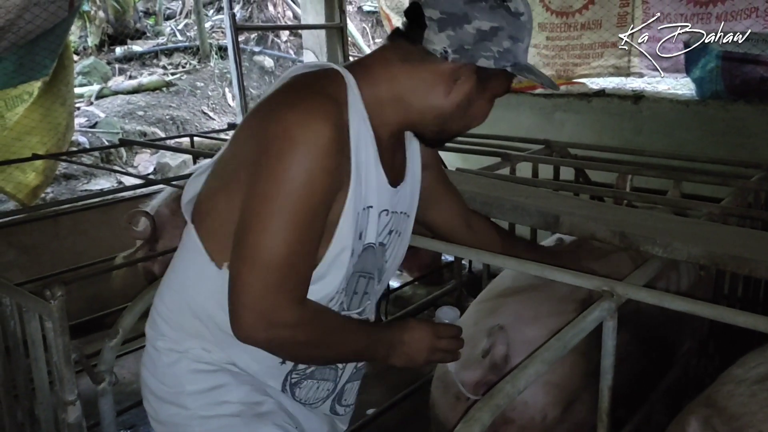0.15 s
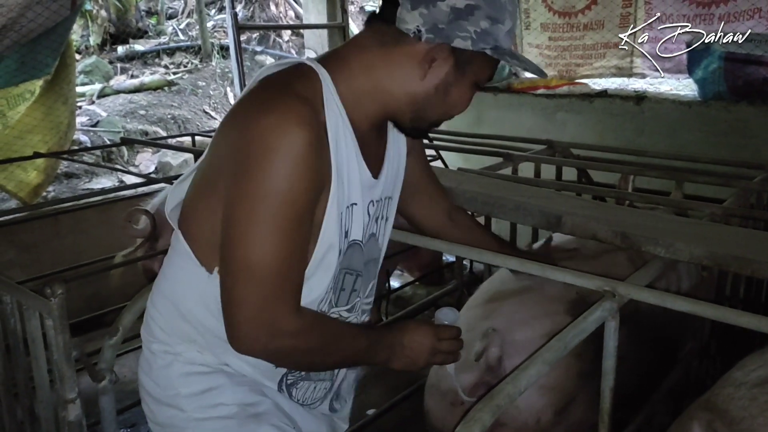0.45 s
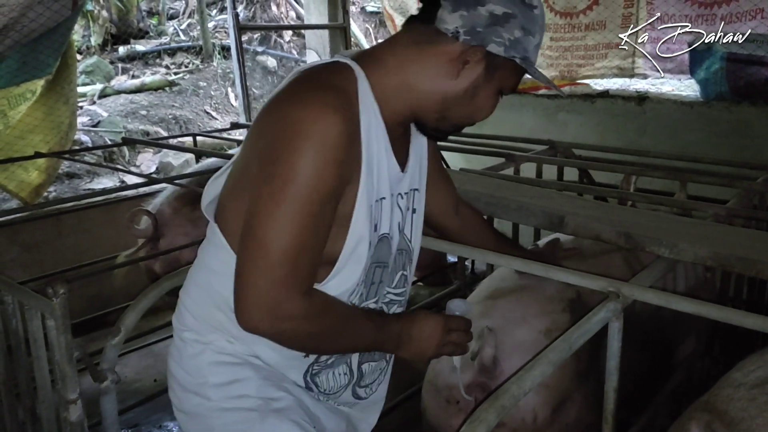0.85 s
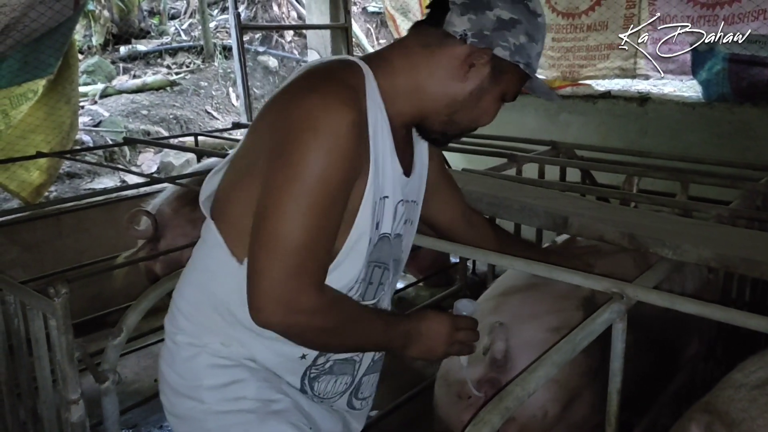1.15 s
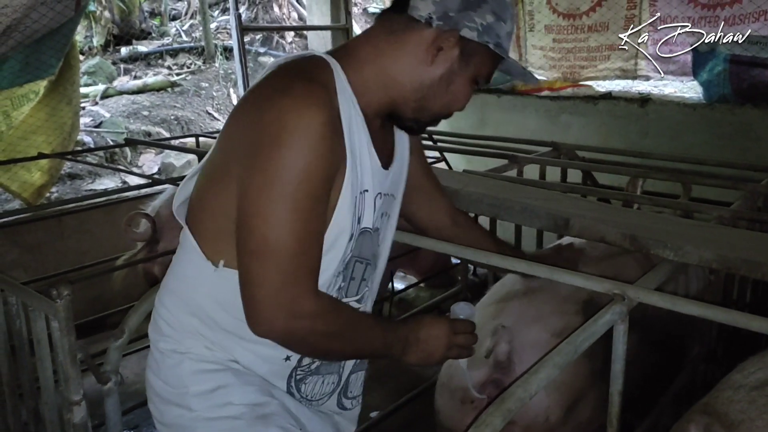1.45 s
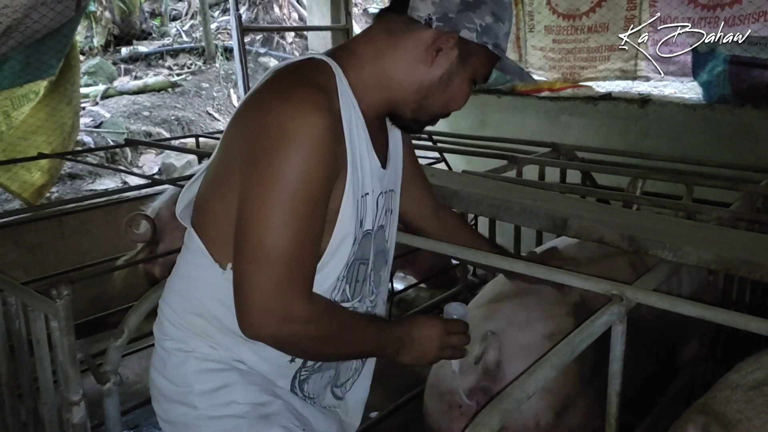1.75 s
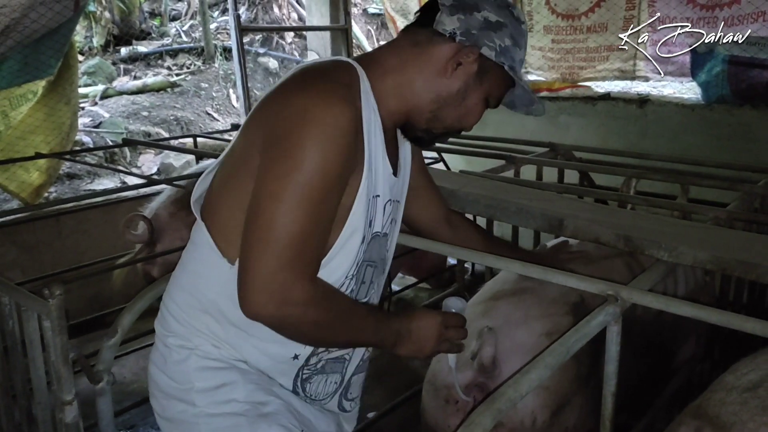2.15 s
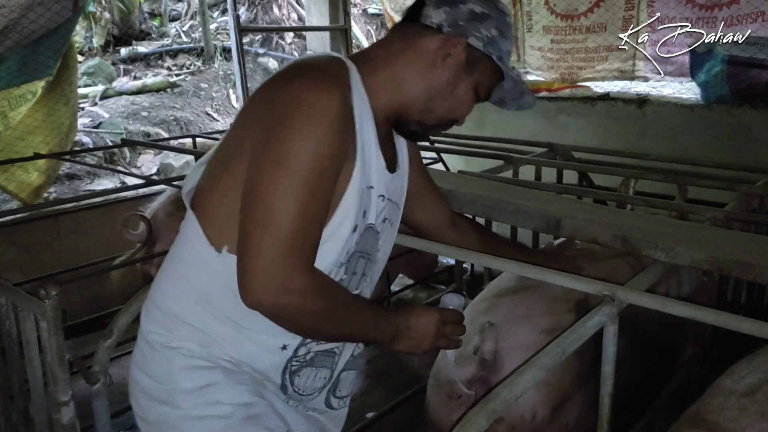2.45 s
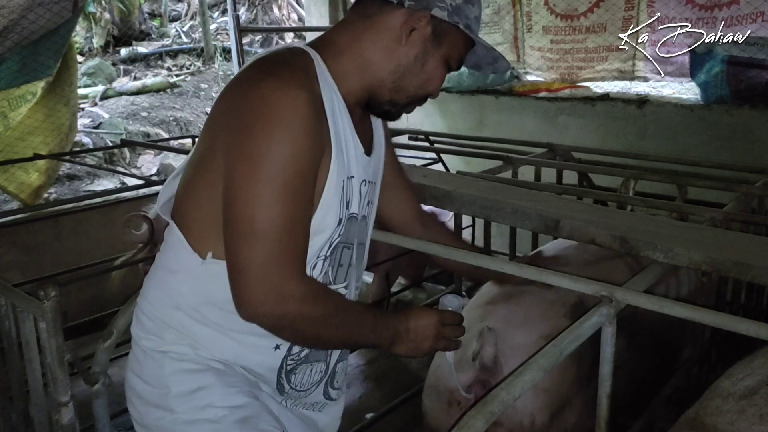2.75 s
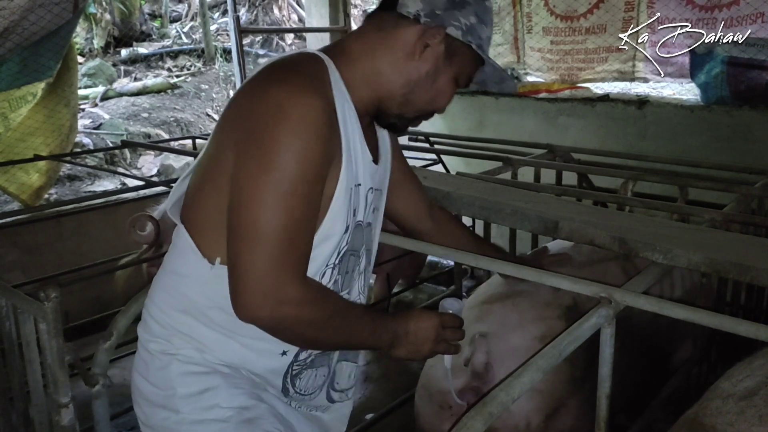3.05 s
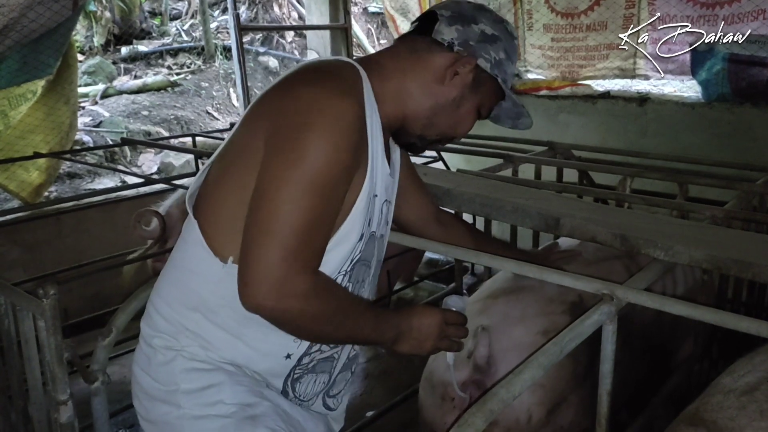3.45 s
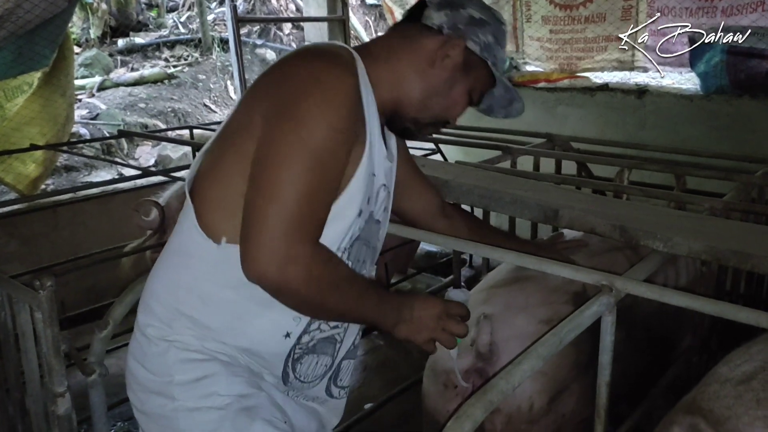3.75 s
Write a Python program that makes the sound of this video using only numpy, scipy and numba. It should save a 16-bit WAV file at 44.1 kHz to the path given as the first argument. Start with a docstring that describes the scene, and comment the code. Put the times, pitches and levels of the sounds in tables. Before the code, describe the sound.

Pigs grunting hoarsely in short calls inside a reverberant pen, ending in a drawn-out rasp.

```python
"""Sows grunting in a pen

Hoarse, short grunts, some built from overlapping parts, in a concrete pen under a low roof.
The last trails into a long rasp. Uneven throat flaps and the air past them ring chest, throat and snout.
Low moans and a thin nasal whistle join in; snorts, scuffles and knocks on the stalls are shaped noise.
The pen adds reflections, a tail and standing waves; a faint outdoor hiss and rumble lies beneath."""
import sys
import numpy as np
from scipy import signal
from scipy.fft import rfft, irfft
from scipy.io import wavfile
from scipy.ndimage import uniform_filter1d
from numba import njit

SR = 44100
rng = np.random.default_rng(int(sys.argv[2]) if len(sys.argv) > 2 else 0)


def log_audio(samples):
    """Write samples as a 16-bit WAV file to the path given in sys.argv[1]."""
    # one column per channel
    frames = np.atleast_2d(samples).T
    # limit to full scale, then quantise
    limited = np.clip(frames, -1, 1)
    pcm = np.round(limited * 32767).astype(np.int16)
    wavfile.write(sys.argv[1], SR, pcm)


N = 171990
T_S = np.arange(N) / SR
BINS_HZ = np.fft.rfftfreq(N, 1 / SR)

# reverberation of the pen: [f/Hz, t60/s, left-right likeness/0-1]
PEN_DECAY = [(120, 0.99, 0.96), (280, 0.46, 0.92), (630, 0.77, 0.61), (1200, 0.39, 0.02), (3000, 0.59, 0),
             (6000, 0.46, 0), (12000, 0.2, 0)]


def undb(db):
    """Level in dB to amplitude."""
    return 10 ** (np.asarray(db) / 20)


def unit(x):
    """Scale to rms 1."""
    return x / np.sqrt(np.mean(x ** 2))


def noise():
    """White noise, rms about 1."""
    return rng.standard_normal(N)


def over_hz(table, col):
    """A table column interpolated over log frequency, for every bin."""
    table = np.array(table, float)
    return np.interp(np.log(BINS_HZ + 1), np.log(table[:, 0]), table[:, col])


@njit
def svf(x, hz, width_hz):
    """State-variable band-pass with a moving centre, unity gain there."""
    y, band, low = np.empty(len(x)), 0., 0.
    for i in range(len(x)):
        g = np.tan(np.pi * hz[i] / SR)
        damping = width_hz / hz[i]
        v = (band + g * (x[i] - low)) / (1 + g * (g + damping))
        band = 2 * v - band
        low = low + 2 * g * v
        y[i] = damping * v
    return y


def resonate(x, hz, width_hz):
    """A steep resonance: two equal band-passes in series, rms 1."""
    centre_hz = np.minimum(hz, .45 * SR) * np.ones(N)
    once = svf(x, centre_hz, float(width_hz))
    return unit(svf(once, centre_hz, float(width_hz)))


def notch(x, hz, width_hz, depth):
    """A side cavity swallows one band: the band-pass is subtracted, twice."""
    for _ in range(2):
        x = x - np.clip(depth, 0, 1) * svf(x, hz * np.ones(N), float(width_hz))
    return x


def swell(at_s, rise_s, hold_s, fall_s):
    """Envelope, linear in dB: rise and fall times are per 20 dB."""
    before = np.maximum((at_s - T_S) / rise_s, 0)
    after = np.maximum((T_S - at_s - hold_s) / fall_s, 0)
    return undb(-20 * np.minimum(before + after, 10))


def flaps(rate):
    """Uneven throat flaps as pulses, and a decaying puff of air after each; both rms 1."""
    jitter, scatter_db, puff_cycles = .22, 1.5, .45
    steady_air = .11  # leak between flaps, against a puff
    chance = rng.standard_normal((800, 2))
    times_s = np.cumsum(np.exp(jitter * chance[:, 0])) / rate
    cycle = np.interp(T_S, np.r_[0, times_s[:-1]], np.arange(len(times_s)))
    size = undb(scatter_db * chance[:, 1])[cycle.astype(int)]
    pulses = np.diff(np.floor(cycle), prepend=0) * size
    puffs = noise() * size * (steady_air + np.exp(-(cycle % 1) / puff_cycles))
    return unit(pulses), unit(puffs)


def voiced(source, air):
    """Flaps and air blended; air is a share of power."""
    air = np.clip(air, 0, 1)
    pulses, puffs = source
    return np.sqrt(1 - air) * pulses + np.sqrt(air) * puffs


def waver():
    """Random trembling of a resonance, as a factor on its frequency."""
    steps_per_s, rms_octaves = 28, .031
    size = int(SR / steps_per_s)
    steps = noise()[np.arange(N) // size]
    return np.exp2(rms_octaves * unit(uniform_filter1d(steps, size)))


def diffuse():
    """Spectra of left and right noise, as alike at each frequency as the pen makes them."""
    alike = np.clip(over_hz(PEN_DECAY, 2), 0, 1)
    common = rfft(noise()) * np.sqrt(1 + alike)
    opposed = rfft(noise()) * np.sqrt(1 - alike) * np.array([[1], [-1]])
    return (common + opposed) / np.sqrt(2)


def yard():
    """Faint outdoor hiss and rumble: diffuse noise coloured by a spectrum."""
    # outdoor spectrum: [f/Hz, relative density/dB]
    outdoor = [(18, -52), (30, -42), (76, -8), (137, -9.5), (254, 0), (1380, -11), (3230, -10),
               (6640, -18.5), (7750, -20), (8810, -23), (10600, -18.5), (12000, -23.5), (14000, -16)]
    return undb(-37) * unit(irfft(diffuse() * undb(over_hz(outdoor, 1)), N))


def standing_waves(x):
    """Narrow frequencies that build up between the walls."""
    # pen modes: [f/Hz, width/Hz, gain at f/dB]
    modes = [(374, 14, 6), (515, 18, 3), (1105, 30, 3), (1160, 24, 1), (1245, 24, 3), (1781, 24, 4),
             (3880, 90, 3)]
    gain = 1 + sum((undb(db) - 1) / (1 + 2j * (BINS_HZ - hz) / width_hz) for hz, width_hz, db in modes)
    return irfft(rfft(x) * gain, N)


def pen(x):
    """Direct sound plus noise decaying fast (walls and roof) and slowly (tail), band by band."""
    early_tau_s, early_db, tail_db, direct_db = .029, -3.5, -5, -9.5
    field, response = diffuse(), 0
    for k, (_, t60_s, _) in enumerate(PEN_DECAY):
        weights = [(row[0], j == k) for j, row in enumerate(PEN_DECAY)]
        band = irfft(field * over_hz(weights, 1), N)
        power = 0
        for tau_s, db in ((early_tau_s, early_db), (t60_s / np.log(1000), tail_db)):
            power = power + undb(db) ** 2 * np.exp(-2 * T_S / tau_s) * 2 / (tau_s * SR)
        response = response + band * np.sqrt(power)
    reflected = signal.fftconvolve(x[None], standing_waves(response), axes=1)[:, :N]
    return undb(direct_db) * x + reflected


def bands(source, levels_db):
    """A source spread over six broad bands at the given levels."""
    # noise bands: [f/Hz, section width/Hz]
    broad = [(380, 440), (1200, 980), (2250, 2120), (3700, 2600), (6300, 10200), (12300, 3600)]
    return sum(undb(db) * resonate(source, hz, width_hz) for db, (hz, width_hz) in zip(levels_db, broad))


def knocks():
    """Knocks on the stalls: short noise clacks, each with one ringing resonance."""
    # knocks: [t/s, ring f/Hz, ring level/dB, six broad-band levels/dB]
    hits = [ (0.158, 3300, -27.5, -45, -48, -37, -27, -45, -47),
            (0.628, 2540, -41, -30, -39, -26, -48, -32.5, -42),
            (1.139, 2090, -31, -58, -53, -31.5, -38.5, -48, -47),
            (1.233, 1400, -32, -30.5, -27.5, -39, -46, -59, -46),
            (1.706, 3330, -36, -54, -38, -31, -35.5, -30.5, -41),
            (2.227, 2730, -28, -37, -55, -33.5, -28.5, -48, -52),
            (2.25, 1200, -35.5, -52, -33, -35, -46, -57, -60),
            (2.386, 3300, -39.5, -58, -54, -53, -55, -55, -56),
            (2.997, 3100, -38.5, -61, -37.5, -32, -44, -40, -42.5),
            (3.804, 2300, -29, -60, -27, -24.5, -35, -36, -44)]
    out = 0
    for at_s, hz, db, *levels_db in hits:
        ring = undb(db) * resonate(noise(), hz, width_hz=440)
        envelope = swell(at_s, rise_s=.0014, hold_s=.0084, fall_s=.017)
        out = out + envelope * (bands(noise(), levels_db) + ring)
    return out


def snorts():
    """Snorts and scuffles: fluttering puffs and steady noise in broad bands."""
    # snorts: [t/s, rise/s per 20 dB, hold/s, fall/s per 20 dB, six broad-band levels/dB]
    rushes = [ (.01, 0.04, 0.013, 0.058, -44, -37, -34.5, -44, -43, -54),
              (0.171, 0.011, 0.028, 0.16, -53, -36, -33.5, -27.5, -32, -36.5),
              (.36, 0.035, 0.066, 0.072, -37, -69, -33.5, -36.5, -45, -38.5),
              (.50, 0.053, 0.0095, 0.024, -67, -58, -54, -47, -40, -39.5),
              (0.644, 0.018, 0.0085, 0.083, -27.5, -24.5, -22, -25.5, -29, -38),
              (0.704, 0.041, 0.0071, 0.056, -64, -63, -27.5, -30.5, -40, -39),
              (0.866, 0.039, 0.022, 0.074, -32.5, -24.5, -15, -36, -27, -27.5),
              (0.906, 0.03, 0.005, 0.09, -71, -21, -33, -31, -60, -43),
              (1.04, 0.04, 0.016, 0.12, -41, -38.5, -62, -65, -44.5, -43),
              (1.193, 0.041, 0.013, 0.03, -59, -52, -42, -36.5, -36, -43),
              (1.275, 0.035, 0.022, 0.25, -40.5, -55, -45, -46, -43, -47),
              (2.092, 0.18, 0.023, 0.058, -36, -69, -48, -56, -60, -63),
              (2.33, 0.1, 0.015, 0.037, -37.5, -38.5, -36.5, -42, -42, -41.5),
              (2.821, 0.059, 0.012, 0.031, -36, -33, -65, -35, -56, -42.5),
              (3.02, 0.062, 0.095, 0.13, -70, -47, -37.5, -42, -42, -46),
              (3.485, 0.035, 0.016, 0.047, -43.5, -43, -43, -38, -60.5, -42),
              (3.649, 0.053, 0.069, 0.16, -33, -41, -31, -50, -70, -65),
              (3.784, 0.048, 0.0088, 0.094, -67, -35, -24.5, -31, -28, -30.5)]
    out = 0
    for at_s, rise_s, hold_s, fall_s, *levels_db in rushes:
        air = flaps(rate=110)[1] + .54 * noise()
        out = out + swell(at_s, rise_s, hold_s, fall_s) * bands(air, levels_db)
    return out


def whistle():
    """Air squeezed through a narrow nostril before the first grunt: narrow-band noise."""
    # whistle, one row: t/s, rise/s per 20 dB, hold/s, fall/s per 20 dB, level/dB, f/Hz, section width/Hz
    nostril = (.106, .006, .035, .06, -36, 4220, 450)
    at_s, rise_s, hold_s, fall_s, db, hz, width_hz = nostril
    return undb(db) * swell(at_s, rise_s, hold_s, fall_s) * resonate(noise(), hz, width_hz)


def moans():
    """Low, almost tonal voice: only the throat rings, and its resonance may slide."""
    # moans: [t/s, rise/s per 20 dB, hold/s, fall/s per 20 dB, level/dB, throat f/Hz at t, climb/(Hz/s)]
    calls = [(0.82, 0.044, .06, 0.053, -39, 202, -550), (2.088, 0.073, 0.026, 0.036, -40, 570, 0),
             (2.345, 0.3, 0.076, 0.056, -36.5, 482, 500), (2.552, 0.055, 0.049, 0.029, -23.5, 488, 400),
             (2.619, .02, 0.02, 0.048, -27, 372, -300), (3.375, .05, 0.43, 0.096, -41.5, 417, -250)]
    out = 0
    for at_s, rise_s, hold_s, fall_s, db, hz, climb in calls:
        throat_hz = hz + climb * np.clip(T_S - at_s, -rise_s, hold_s + fall_s)
        tone = resonate(voiced(flaps(rate=100), air=.28), throat_hz, width_hz=110)
        out = out + undb(db) * swell(at_s, rise_s, hold_s, fall_s) * tone
    return out


def long_rasp():
    """Drawn-out hoarse flutter: low resonances tremble, upper ones and the nasal notch drift upward."""
    # course: [t/s, level/dB, snout f/Hz, upper f/Hz, nasal notch f/Hz, mouth f/Hz]
    course = [(3.282, -48, 3530, 5600, 4520, 1100), (3.35, -23.5, 3850, 6000, 4700, 1260),
              (3.45, -23, 3930, 6400, 5000, 1290), (3.60, -25, 3660, 5970, 5600, 1210),
              (3.68, -22, 3900, 6430, 6140, 1350), (3.76, -26.5, 4000, 6500, 5840, 1260),
              (3.83, -71, 3950, 6550, 5950, 1250)]
    # lower resonances: [f/Hz, section width/Hz, relative level/dB]
    lower = [(230, 170, -21.5), (410, 370, -23), (963, 180, -13.5), (1867, 130, -29), (2370, 740, -4.5),
             (3100, 250, -10)]
    times_s, *columns = np.array(course).T
    db, snout_hz, upper_hz, notch_hz, mouth_hz = (np.interp(T_S, times_s, col) for col in columns)
    flutter, tremble = flaps(rate=100), waver()
    throaty, airy = voiced(flutter, air=.38), voiced(flutter, air=.94)
    body = sum(undb(d) * resonate(throaty, hz * tremble, width_hz) for hz, width_hz, d in lower)
    mouth = undb(-9) * resonate(throaty, mouth_hz * tremble, width_hz=170)
    snout = undb(1) * resonate(airy, snout_hz, width_hz=1080)
    upper = undb(-7.5) * resonate(airy, upper_hz, width_hz=750)
    call = notch(body + mouth + snout + upper, notch_hz, width_hz=760, depth=.85)
    return call * undb(db) * swell(times_s[0], .015, times_s[-1] - times_s[0], .025)


def mouth_ring(source, hz, width_hz):
    """The mouth resonance and two weaker neighbours, trembling together."""
    # side resonances: [f/Hz, section width/Hz, level against the mouth/dB]
    sides = [(874, 90, -11), (1887, 150, -11.5)]
    tremble = waver()
    neighbours = sum(undb(db) * resonate(source, f * tremble, w) for f, w, db in sides)
    return resonate(source, hz * tremble, width_hz) + neighbours


def grunts():
    """The chest leads; throat and upper resonances glide in opposite directions, either way or not at all."""
    # grunts or parts of one: [t/s, rise/s per 20 dB, hold/s, fall/s per 20 dB, nominal flap rate/(1/s),
    #   throat f/Hz, mouth f/Hz, lower snout f/Hz, upper snout f/Hz, rasp f/Hz, nasal notch f/Hz,
    #   mouth section width/Hz, mouth glide/(octaves/s),
    #   level/dB of chest, throat, mouth, palate, lower snout, upper snout, rasp]
    calls = [ (0.195, 0.055, 0.023, 0.16, 63.6, 372, 1070, 3300, 3950, 4720, 5500, 300, -2, -38.5, -41, -49, -30, -32, -32, -39),
             (0.278, 0.09, 0.046, 0.079, 55.03, 400, 1120, 3060, 3700, 6040, 5200, 380, 0.5, -31, -37, -28.5, -34, -28.5, -37, -37),
             (0.382, 0.027, 0.037, 0.031, 54.7, 407, 1080, 3100, 3520, 6200, 5400, 350, 0.5, -31, -47, -36, -52, -38, -36, -54),
             (0.843, 0.043, 0.023, 0.22, 70, 384, 1010, 2850, 3500, 5500, 4700, 350, 2, -34.5, -35, -34, -27, -38, -57, -33),
             (1.375, 0.056, 0.043, 0.045, 74.26, 343, 1084, 3000, 3590, 5800, 4930, 293, 0.5, -41, -33, -24.5, -27, -23.5, -26.5, -50),
             (1.423, 0.13, 0.024, 0.13, 64.3, 340, 1200, 3150, 4040, 5600, 5450, 293, -1.7, -31.5, -48, -21, -20, -21, -19, -20),
             (1.896, 0.1, 0.039, 0.16, 68.12, 362, 1140, 3410, 3793, 5400, 4640, 147, 0.5, -31, -31, -19, -20, -20.5, -15, -18),
             (2.552, 0.033, 0.031, 0.037, 79.8, 470, 1140, 3350, 3650, 5300, 4500, 158.5, 0, -37, -24.5, -22.5, -26, -27.5, -38, -29.5),
             (2.582, 0.016, 0.069, 0.13, 61.88, 383, 1115, 3350, 3860, 5120, 4260, 220, 3, -33, -27, -17.5, -21.5, -17.5, -17.5, -16.5),
             (3.246, 0.075, 0.046, 0.12, 75.63, 397, 1146, 3280, 3600, 5600, 4500, 600, 2, -30, -25, -26.5, -24.5, -21, -19, -18.5)]
    # chest to rasp, as the levels: [lag/s, share of rise time, air/0-1, glide/share of mouth glide]
    traits = [(-0.03, 1.4, 0.25, 0), (-.012, 0.79, 0, -1.7), (-0.01, 0.85, 0.15, 1),
              (0.0036, 1.05, 0.65, .3), (0.0059, 0.78, 0.6, .3), (0.011, 0.36, .9, 0.39),
              (0, 0.41, 1, 0.54)]
    chest_hz, palate_hz, glide_s = 239.6, 2355, .035
    rings = (resonate, resonate, mouth_ring, resonate, resonate, resonate, resonate)
    out = 0
    for (at_s, rise_s, hold_s, fall_s, rate, throat_hz, mouth_hz, snout_hz, upper_hz, rasp_hz,
         notch_hz, mouth_width_hz, octaves_per_s, *levels_db) in calls:
        source, call = flaps(rate), 0
        glide_octaves = octaves_per_s * np.clip(T_S - at_s - hold_s / 2, -glide_s, glide_s)
        centres_hz = (chest_hz, throat_hz, mouth_hz, palate_hz, snout_hz, upper_hz, rasp_hz)
        widths_hz = (192, 123, mouth_width_hz, 380, 840, 747, 1530)
        for ring, hz, width_hz, db, trait in zip(rings, centres_hz, widths_hz, levels_db, traits):
            lag_s, share, air, glide = trait
            effort = undb(db) * swell(at_s + lag_s, rise_s * share, hold_s, fall_s)
            moving_hz = hz * np.exp2(glide * glide_octaves)
            call = call + effort * ring(voiced(source, air), moving_hz, width_hz)
        rasp_effort = effort  # the rasp comes last
        spray = undb(-17) * resonate(source[1], 11300, width_hz=10800)  # fine hiss
        out = out + notch(call, notch_hz, width_hz=270, depth=.47) + rasp_effort * spray
    return out


def scene():
    """All sources in the pen, with extra direct sound from the close stalls, over the yard."""
    clacks = knocks()
    # the cheeks swallow a narrow band between mouth and palate
    voices = notch(grunts() + long_rasp(), 1967, width_hz=133, depth=.78)
    inside = pen(voices + moans() + whistle() + snorts() + clacks)
    return inside + undb(-12.5) * clacks + yard()


def record(dry):
    """Left and right each have their own tone colour; peaks are rounded and the top is cut steeply."""
    # tone colour: [f/Hz, left gain/dB, right gain/dB]
    colour = [(99, 0.5, 0), (430, -3, -2), (625, -1, -1), (846, 1.5, 2), (1200, -2.5, -1.5), (1510, 0, 1),
              (2370, -4.5, 2), (3300, -2.5, 6), (3812, -8, 0), (4700, -4.5, 0), (5600, -7, -0.5),
              (6400, -9, 0.5), (7870, -6.5, -5.5), (8950, -10.5, -9.5), (11700, 1.5, -6),
              (14500, -10.5, -13)]
    top_hz, ceiling = 14250, .84
    heard = irfft(rfft(dry) * undb([over_hz(colour, 1), over_hz(colour, 2)]), N)
    rounded = ceiling * np.tanh(heard / ceiling)
    return signal.sosfilt(signal.ellip(10, .2, 80, top_hz, fs=SR, output="sos"), rounded)


dry = scene()
out = record(dry)
log_audio(out)
```